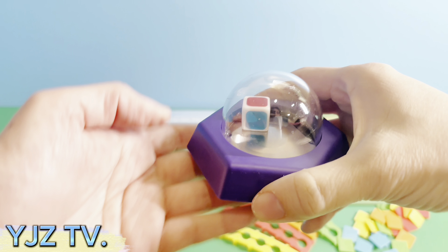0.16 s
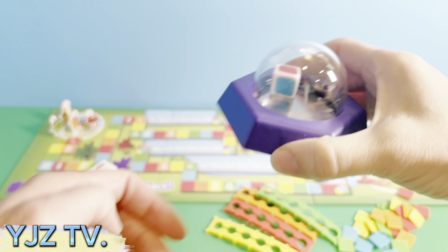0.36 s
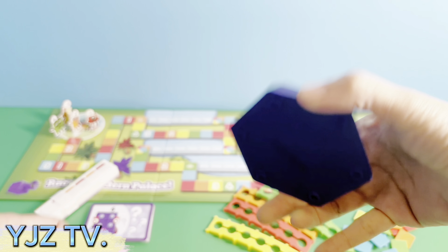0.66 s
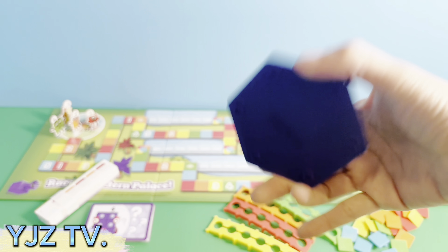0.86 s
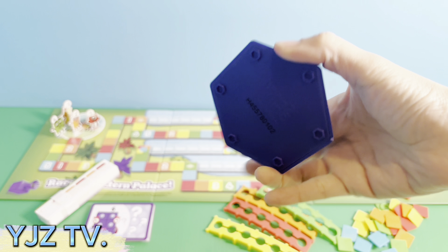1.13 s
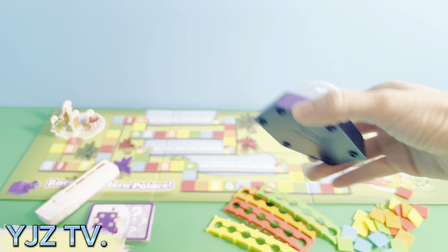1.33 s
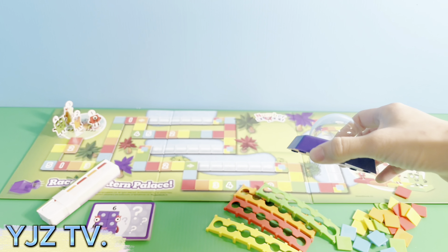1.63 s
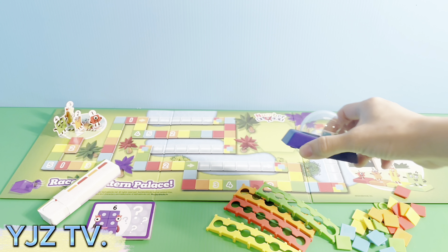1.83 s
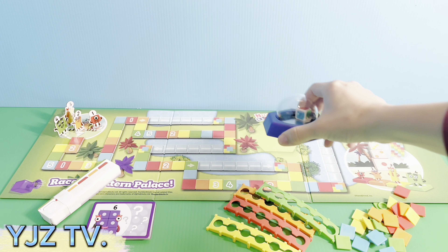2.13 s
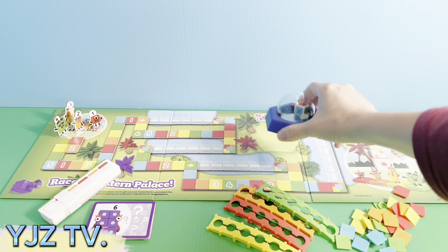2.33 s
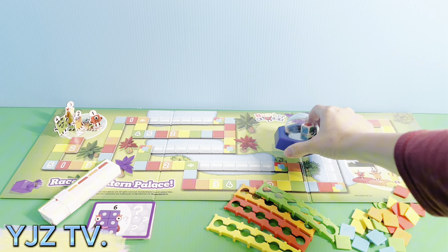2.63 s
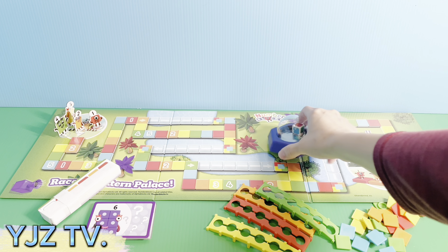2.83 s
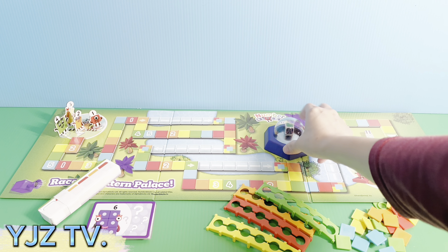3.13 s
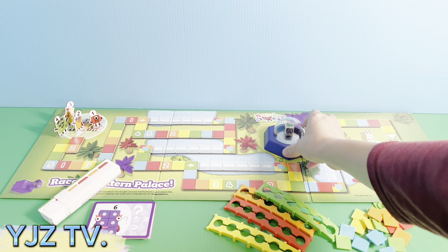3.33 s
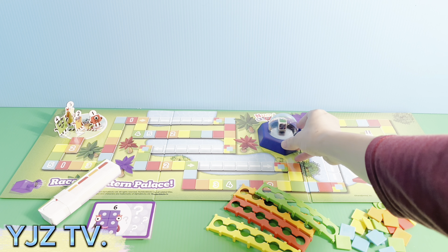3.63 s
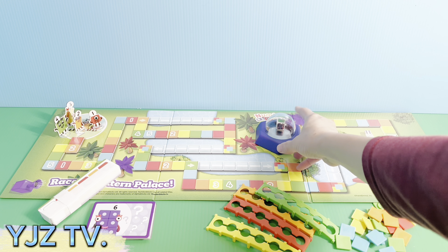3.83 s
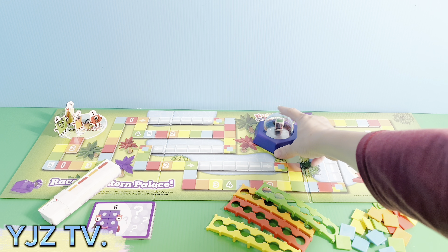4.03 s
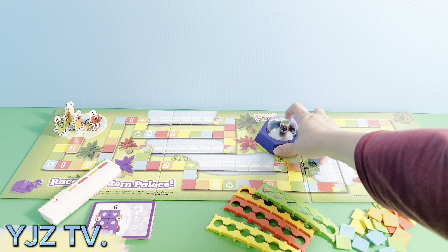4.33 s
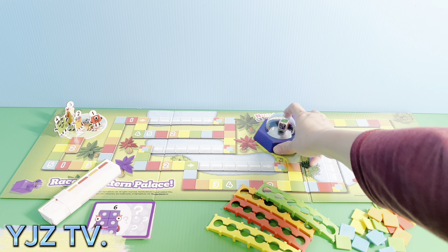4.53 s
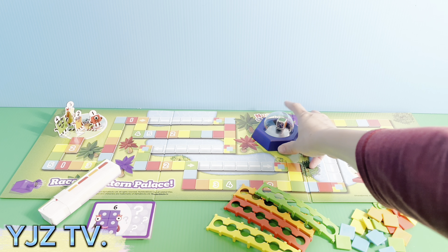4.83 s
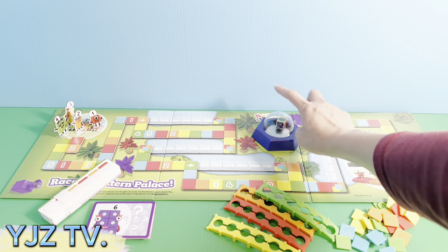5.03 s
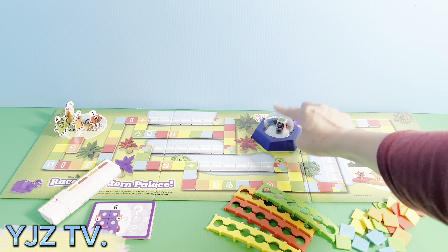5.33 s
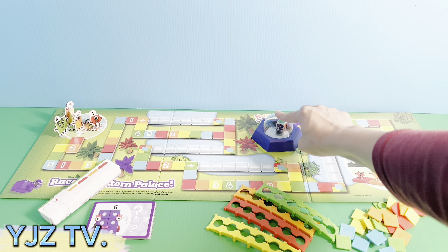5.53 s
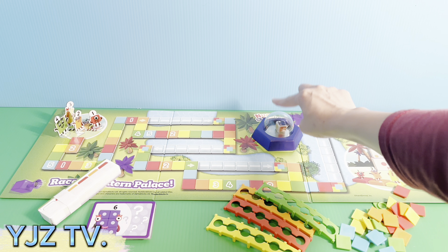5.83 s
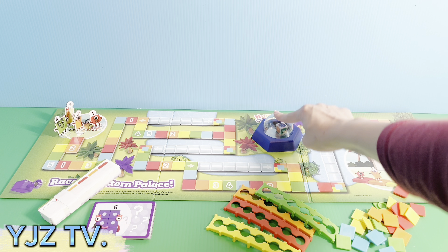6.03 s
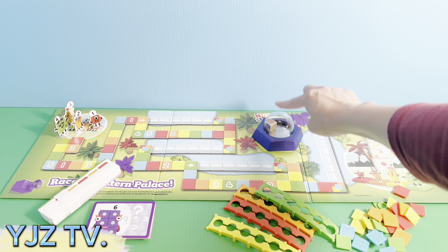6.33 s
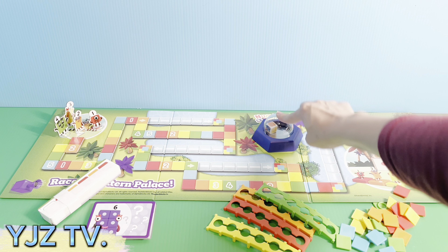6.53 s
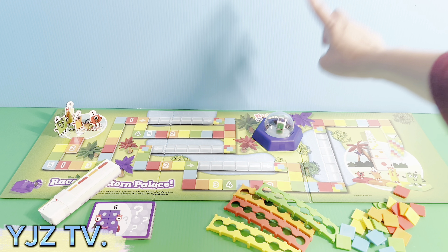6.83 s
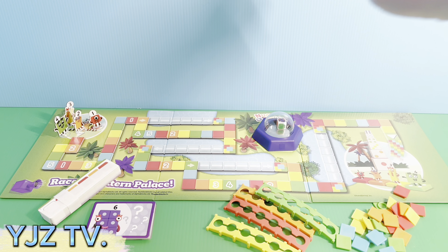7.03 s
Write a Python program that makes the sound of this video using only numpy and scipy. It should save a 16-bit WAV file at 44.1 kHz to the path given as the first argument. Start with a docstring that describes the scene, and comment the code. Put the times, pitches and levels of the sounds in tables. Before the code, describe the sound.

A die clatters brightly in a hollow plastic dome as the toy is tipped in the hand near a stereo microphone. It is carried away with faint skin and sleeve rustle and lands on a board with a woody clack. Light finger ticks and near silence follow, then three crisp two-part pops fling the die about, and a soft rustle ends it. Short room reflections, low background rumble.

```python
"""In a small, lively room with a low rumble, a plastic dice popper is heard from close by.
It is turned over in the hand, so that the die tumbles in its dome, and is set down on a game board.
A finger presses the dome three times: the spring plate creaks, snaps down, snaps back and throws the die about.
Contacts are short bursts of noisy force that ring resonant plastic or board; sliding and rumble are coloured
noise, and shifting reflections place the toy in its room."""
import sys
import numpy as np
from scipy import signal
from scipy.fft import rfft, irfft, next_fast_len
from scipy.io import wavfile

SR = 44100
rng = np.random.default_rng(int(sys.argv[2]) if len(sys.argv) > 2 else 0)


def generate_wav(sig):
    """Save sig (samples, or channels by samples) to the path in sys.argv[1] as 16-bit PCM at SR."""
    pcm = np.round(np.clip(np.atleast_2d(sig).T, -1, 1) * 32767).astype(np.int16)
    wavfile.write(sys.argv[1], SR, pcm)


N = 316197  # length [samples]
HIT_SIZE = 8192  # length of one contact with its ringing [samples]


def from_db(db):
    """Decibels to amplitude gain."""
    return 10 ** (np.asarray(db) / 20)


def rms_one(x):
    """Scale to unit rms."""
    return x / np.sqrt(np.mean(x ** 2) + 1e-20)


def at_hz(points, hz):
    """Read a table along a logarithmic frequency axis."""
    table_hz, value = np.transpose(points)
    return np.interp(np.log(np.maximum(hz, 1)), np.log(table_hz), value)


def bins(size):
    """Frequencies of a real transform [Hz]."""
    return np.arange(size // 2 + 1) * SR / size


def causal(gain):
    """The minimum-phase response with this magnitude: nothing sounds early."""
    cepstrum = irfft(np.log(gain + 1e-9))
    half = len(cepstrum) // 2
    cepstrum[1:half] *= 2
    cepstrum[half + 1:] = 0
    return np.exp(rfft(cepstrum))


def left_right(mid, side):
    """Two channels from mid and side."""
    return np.array([mid + side, mid - side])


def add(out, sound, s):
    """Mix a sound in at s seconds."""
    start = int(s * SR)
    out[:, start:start + sound.shape[1]] += sound[:, :N - start]


# broad crack of a contact: (frequency [Hz], level [dB])
CRACK_COLOUR = [(60, -27.5), (130, -11.5), (220, 0), (330, -2), (480, -4.5), (700, 6.5), (1500, -6.5),
                (2500, 1), (5000, 2), (8000, 3), (16000, -3)]


def body(modes, crack_db):
    """Responses of a struck part, one a row: the broad crack of the contact, then each two-pole resonance."""
    hz = bins(HIT_SIZE)
    z = np.exp(-2j * np.pi * hz / SR)  # delay of one sample
    rows = [causal(from_db(crack_db + at_hz(CRACK_COLOUR, hz)))]
    for mode_hz, width_hz, db in modes:
        radius = np.exp(-np.pi * width_hz / SR)
        poles = 1 - 2 * radius * np.cos(2 * np.pi * mode_hz / SR) * z + (radius * z) ** 2
        rows.append(from_db(db) * (1 - radius ** 2) / 2 * (1 - z * z) / poles)
    return np.array(rows)


# a favoured resonance is lifted over a half-width of ACCENT_HZ plus a share of its frequency
ACCENT_DB, ACCENT_HZ, ACCENT_SHARE = 6, 70, .035
MODE_SPREAD_DB = 3.5  # random spread of each resonance from contact to contact
# side of a contact relative to its mid: (frequency [Hz], level [dB])
CONTACT_SIDE = [(100, -17.5), (250, -12), (450, 3), (750, -1.5), (1300, -0.5), (2400, -8), (4400, -4.5),
                (8500, -13), (12000, -30.5), (15000, -18.5)]


def strike(contacts, modes, crack_db, side_db, pan_db, grain_db, swell):
    """Each contact is a short run of chatter that sets the part ringing; it swells for a share of its length.

    A level is the energy at 1.5-5 kHz, as dB over 10 ms; bass and treble are relative to that.
    """
    out = np.zeros((2, N))
    t, hz = np.arange(HIT_SIZE) / SR, bins(HIT_SIZE)
    responses = body(modes, crack_db)
    side_response = causal(from_db(side_db + at_hz(CONTACT_SIDE, hz)))
    bass = 1 / (1 + (hz / 1500) ** 8)
    treble = 1 - 1 / (1 + (hz / 5000) ** 8)
    ranges = np.array([bass, 1 - bass - treble, treble])
    for s, db, bass_db, treble_db, length_s, *favoured in contacts:
        mid, side, grain, strengths = rng.standard_normal((4, HIT_SIZE))
        progress = t / max(length_s, 5e-4)
        onset = 1 - np.exp(-(progress / swell) ** 2)
        force = onset * np.exp(-progress ** 2) * from_db(grain_db * np.tanh(grain))
        # every spot on the part drives the resonances differently
        mode_gains = from_db(MODE_SPREAD_DB * strengths[:len(modes), None])
        response = responses[0] + (mode_gains * responses[1:]).sum(axis=0)
        # the spot also favours two frequencies
        lift_db = sum(ACCENT_DB / (1 + ((hz - f) / (ACCENT_HZ + ACCENT_SHARE * f)) ** 2) for f in favoured)
        blow = left_right(rfft(mid * force), rfft(side * force) * side_response)
        sound = blow * response * causal(from_db(lift_db))
        # the hardness of the contact shares its energy between bass, middle and treble
        power = ranges @ np.mean(abs(sound) ** 2, axis=0) * 2 / HIT_SIZE / (.01 * SR)
        gains_db = db + np.array([bass_db, 0, treble_db]) - 10 * np.log10(power)
        add(out, irfft(sound * causal(from_db(gains_db @ ranges))), s)
    return out * from_db([[pan_db / 2], [-pan_db / 2]])


# side of rumble and sliding relative to their mid: (frequency [Hz], level [dB])
NOISE_SIDE = [(60, -14), (200, -13.5), (500, -2), (1500, 0), (4000, -2), (10000, -17)]


def coloured_noise(spectrum, resonances=()):
    """Stereo noise of rms 1, nearly alike in both ears in the bass, lifted at its resonances."""
    size = 2 * next_fast_len(N // 2 + 1)
    mid, side = rfft(rng.standard_normal((2, size)))
    hz = bins(size)
    lift_db = sum(db / (1 + (2 * (hz - f) / width) ** 2) for f, width, db in resonances)
    colour_db = at_hz(spectrum, hz) + lift_db
    stereo = left_right(mid, side * from_db(at_hz(NOISE_SIDE, hz)))
    return rms_one(irfft(stereo * from_db(colour_db))[:, :N])


# background rumble, shape only: (frequency [Hz], relative level [dB])
RUMBLE_COLOUR = [(20, -34), (30, -29), (42, -5.5), (55, -3), (70, 0.5), (100, -6), (190, -13), (330, -15.5),
                 (440, -11), (680, -23.5), (1200, -25), (2600, -48.5), (6000, -56.5), (16000, -55)]
RUMBLE_DB = -54.5  # rms level


def rumble():
    """Steady noise, strongest in the bass, lies under the whole scene."""
    return from_db(RUMBLE_DB) * coloured_noise(RUMBLE_COLOUR)


# sliding fingers and sleeve while the toy is held, carried, steadied and let go, before the trim RUB_DB:
# (time [s], level [dB])
RUB_LEVELS = [(0.0, -60.5), (0.29, -64), (1.38, -58), (1.644, -56), (1.792, -60.5), (2.14, -74.5),
              (2.78, -69.5), (3.2, -65), (3.502, -71), (3.692, -66), (3.866, -60.5), (3.962, -66),
              (4.106, -68), (4.808, -80), (5.04, -84.5), (6.9, -52), (7.044, -56), (7.17, -72)]
RUB_DB = 1.5
# colour of the sliding, shape only: (frequency [Hz], relative level [dB])
RUB_SPECTRUM = [(300, -9.5), (900, -1), (1900, -6), (3500, -7), (6000, -8), (10000, -14), (15000, -15)]
# the rubbed shell sings faintly: (frequency [Hz], width [Hz], lift [dB])
RUB_MODES = [(1830, 690, 9.5), (3143, 270, 6.5)]


def rubbing(slip_db, slips_per_s):
    """Skin and cloth slide unevenly, catching and slipping: noise whose level wavers at random."""
    t = np.arange(N) / SR
    slips = np.interp(t * slips_per_s, np.arange(N), rng.standard_normal(N))
    level_db = RUB_DB + np.interp(t, *np.transpose(RUB_LEVELS)) + slip_db * slips
    return coloured_noise(RUB_SPECTRUM, RUB_MODES) * from_db(level_db)


# the die slides and rolls over the floor of the dome:
# (time [s], level [dB], treble [dB], length [s])
DIE_SLIDES = [(0.313, -48.5, -2, .016), (0.423, -31.5, -8, 0.039), (0.592, -47, -7, 0.013),
              (1.077, -47, -8, 0.024), (1.205, -38, -3.5, 0.056), (1.722, -48, -0.5, 0.071),
              (1.963, -63, 3, 0.037), (2.322, -63.5, 2.5, 0.066), (2.492, -58.5, 5.5, 0.051),
              (2.528, -49.5, -3, 0.046), (2.874, -33, 1, 0.049), (2.935, -34.5, 4.5, 0.033),
              (5.687, -34.5, 6, 0.053), (6.171, -34.5, 3.5, .054), (6.741, -35.5, 5, 0.047)]
# resonances of the dome: (frequency [Hz], width [Hz], level [dB])
DOME_MODES = [(530, 28, -9), (900, 230, -25.5), (1179, 67, 0.5), (1251, 13, 5), (1730, 80, -6),
              (2040, 240, -1.5), (2206, 46, -1), (2700, 90, -4.5), (2853, 150, 1.5), (3270, 50, -1.5),
              (3420, 25, -8), (4130, 150, -1), (4770, 70, -4), (5040, 20, -3), (6430, 27, -18.5),
              (7020, 110, -10), (8350, 160, -9.5), (9100, 630, -21), (14700, 270, -8)]
DOME_NOTE_HZ = 1213  # main note, which hits and slides of the die bring out
# a firmer slide is thinner: bass at a middling level, that level, dB lost per dB
SLIDE_BASS_DB, SLIDE_MIDDLING_DB, SLIDE_THINNING = 1, -48.5, 0.16
SLIDE_HIGH_HZ = 2050  # favoured high resonance


def die_slides():
    """Long, grainy contacts of the die set the dome ringing between the hits."""
    slides = []
    for s, db, treble_db, length_s in DIE_SLIDES:
        bass_db = SLIDE_BASS_DB - SLIDE_THINNING * (db - SLIDE_MIDDLING_DB)
        slides.append((s, db, bass_db, treble_db, length_s, DOME_NOTE_HZ, SLIDE_HIGH_HZ))
    return strike(slides, DOME_MODES, crack_db=-6.5, side_db=-8.5, pan_db=0.3, grain_db=1.0, swell=0.39)


# the die hits dome and floor:
# (time [s], level [dB], treble [dB], length [s], favoured high resonance [Hz])
DIE_BLOWS = [(0.414, -36.5, -2.5, .006, 3500), (0.445, -39.5, 11.5, 0.0037, 2820),
             (0.47, -39, 7, 0.0027, 2030), (0.512, -31.5, -1.5, 0.0041, 2230),
             (0.636, -47, -0.5, 0.0075, 2040), (0.688, -44, -3.5, 0.011, 2200),
             (0.7575, -27.5, -2, 0.0058, 2740), (0.854, -28.5, -5, 0.0097, 2100),
             (0.903, -32, -7, 0.016, 4830), (0.9153, -27, 1, 0.0056, 4770), (0.965, -40, -8, 0.0071, 2800),
             (1.189, -45.5, 3.5, 0.014, 2800), (1.216, -43, 6, 0.0074, 2200),
             (2.891, -37, 2.5, 0.0069, 2030), (2.92, -41.5, 3.5, 0.013, 2200),
             (2.953, -40.5, 1, 0.0086, 5130), (5.625, -34, -15, 0.003, 4200),
             (5.679, -39, 10.5, .013, 2100), (5.71, -35, 6.5, 0.017, 3280),
             (6.0705, -32.5, 6.5, 0.012, 2060), (6.1228, -27.5, 5, 0.012, 3240),
             (6.174, -33, 1.5, 0.0094, 3250), (6.593, -35.5, 3, 0.0074, 3200), (6.673, -32, 8, 0.012, 5740),
             (6.732, -30, 1.5, 0.008, 3960), (6.779, -49, -3, 0.0074, 2030)]
# the harder the die hits, the thinner its bass: bass of a light hit, level where thinning starts, dB lost per dB
DIE_BASS_DB, DIE_FIRM_DB, DIE_THINNING = 4, -32, 2.04


def die_hits():
    """Each hit brings out the dome's note and one higher resonance, depending on where the die lands."""
    hits = []
    for s, db, treble_db, length_s, high_hz in DIE_BLOWS:
        bass_db = DIE_BASS_DB - DIE_THINNING * max(db - DIE_FIRM_DB, 0)
        hits.append((s, db, bass_db, treble_db, length_s, DOME_NOTE_HZ, high_hz))
    return strike(hits, DOME_MODES, crack_db=-11.0, side_db=0.5, pan_db=0.5, grain_db=6.0, swell=0.39)


# dull knocks of die and fingers on the housing: (time [s], level [dB], bass [dB])
HOUSING_KNOCKS = [(0.4251, -38.5, 18.5), (0.629, -45.5, 7.5), (0.666, -47, 18.5), (.769, -39.5, 7.5),
                  (0.809, -58, 25.5), (0.826, -52, 12.5), (.884, -49.5, 5.5), (.912, -52.5, 20.5),
                  (1.131, -45.5, 15), (1.298, -50, 14), (2.963, -48, 13.5)]
# resonances of the housing: (frequency [Hz], width [Hz], level [dB])
HOUSING_MODES = [(472, 45, 1.5), (599, 73, 4.5), (758, 210, -4), (1030, 63, -3.5), (1140, 29, 6.5),
                 (1250, 27, 5), (1740, 140, 0), (2120, 120, 7), (2770, 130, 3.5)]
KNOCK_S, KNOCK_TREBLE_DB, KNOCK_HIGH_HZ = 0.0063, -5.5, 1850
# while the toy is turned over, the die also patters lightly at random moments
TUMBLE_START_S, TUMBLE_END_S = 0.63, 0.99
PATTER_DB, PATTER_SPREAD_DB, PATTER_BASS_DB = -54, 2.5, 12


def housing(count):
    """Dull knocks and light random patter ring the plastic housing."""
    patter = []
    for when, size in rng.random((count, 2)):
        s = TUMBLE_START_S + when * (TUMBLE_END_S - TUMBLE_START_S)
        db = PATTER_DB + PATTER_SPREAD_DB * (2 * size - 1)
        patter.append((s, db, PATTER_BASS_DB))
    knocks = [(s, db, bass_db, KNOCK_TREBLE_DB, KNOCK_S, DOME_NOTE_HZ, KNOCK_HIGH_HZ)
              for s, db, bass_db in HOUSING_KNOCKS + patter]
    return strike(knocks, HOUSING_MODES, crack_db=-36.5, side_db=-1, pan_db=-1.0, grain_db=0.5, swell=0.11)


# dry ticks as the fingers shift their grip: (time [s], level [dB])
TICKS = [(2.015, -72), (2.125, -62), (3.372, -55.5), (3.846, -52), (3.969, -58.5), (4.129, -70.5),
         (4.329, -69), (4.596, -67.5)]
# resonances of the shell under the fingers: (frequency [Hz], width [Hz], level [dB])
SHELL_MODES = [(457, 48, 3), (1280, 81, -10.5), (1690, 49, 5), (2110, 140, 5), (2856, 90, 10)]
TICK_S, TICK_THUD_DB, TICK_TREBLE_DB, TICK_LOW_HZ, TICK_HIGH_HZ = 0.0052, -51.5, -5, 435, 1770


def grip_ticks():
    """Fingers tick on the shell; the thud keeps one level, so the lightest ticks are the dullest."""
    ticks = [(s, db, TICK_THUD_DB - db, TICK_TREBLE_DB, TICK_S, TICK_LOW_HZ, TICK_HIGH_HZ) for s, db in TICKS]
    return strike(ticks, SHELL_MODES, crack_db=-3, side_db=-4, pan_db=4, grain_db=5.5, swell=.35)


# the feet land on the board one after another:
# (time [s], level [dB], bass [dB], treble [dB], favoured low resonance [Hz])
FOOT_BLOWS = [(2.8216, -33, -5, -7, 227), (2.8266, -29, 3.5, 6.5, 217.5), (2.8384, -18.5, -1.5, -10.5, 709),
              (2.848, -27.5, -5, 1, 230), (2.871, -30, -2.5, -4.5, 231)]
# resonances of the game board: (frequency [Hz], width [Hz], level [dB])
BOARD_MODES = [(160, 36, -13), (230, 81, 1), (382, 90, -5), (450, 70, 9.5), (750, 58, 14), (966, 150, 5),
               (1150, 52, 4), (1650, 120, 2.5), (2025, 150, -11.5), (2943, 250, -3), (4900, 680, -8)]
FOOT_S, FOOT_HIGH_HZ = 0.0047, 1940


def feet():
    """The toy is set down: each foot strikes the board, which resounds."""
    blows = [(s, db, bass_db, treble_db, FOOT_S, low_hz, FOOT_HIGH_HZ)
             for s, db, bass_db, treble_db, low_hz in FOOT_BLOWS]
    return strike(blows, BOARD_MODES, crack_db=-7.5, side_db=-1.0, pan_db=0.4, grain_db=-11, swell=0.34)


# the fingertip lands on the dome: (time [s], level [dB])
FINGER_TAPS = [(5.0734, -35), (5.267, -53), (5.381, -48)]
# resonances shared by taps and the plate under the finger: (frequency [Hz], width [Hz], level [dB])
PRESSED_MODES = [(755, 130, 7.5), (800, 190, 12), (1120, 450, -6), (1677, 224, -4.5), (2110, 410, 2.5),
                 (2510, 180, -16), (2870, 56, -4.5), (4460, 137, 5.5), (5750, 44, 7), (7620, 1600, -10.5),
                 (10000, 1600, -19)]
TAP_S, TAP_BASS_DB, TAP_TREBLE_DB, TAP_LOW_HZ, TAP_HIGH_HZ = 0.011, 2.5, 0.5, 847, 4630


def finger_taps():
    """The fingertip lightly sounds the dome, with the resonances of the pressed plate."""
    taps = [(s, db, TAP_BASS_DB, TAP_TREBLE_DB, TAP_S, TAP_LOW_HZ, TAP_HIGH_HZ) for s, db in FINGER_TAPS]
    return strike(taps, PRESSED_MODES, crack_db=-2, side_db=-3.5, pan_db=4.0, grain_db=2.5, swell=0.32)


# the loaded plate creaks, each time with the same low hum: (time [s], level [dB], bass [dB])
CREAK_SLIPS = [(5.366, -48, 15.5), (5.823, -47, 11), (5.833, -41, 16.5), (5.866, -47, 20), (6.322, -46, 15),
               (6.328, -44.5, 12.5), (6.369, -53.5, 17.5)]
# resonances of the loaded plate: (frequency [Hz], width [Hz], level [dB])
CREAK_MODES = [(242, 34, -38), (767, 27, -16.5), (798, 26, -8.5), (2080, 180, -14), (2762, 88, -29),
               (3250, 69, -11.5), (5780, 310, -6), (8430, 400, -18)]
CREAK_S, CREAK_TREBLE_DB, CREAK_LOW_HZ, CREAK_HIGH_HZ = 0.0071, 2, 825, 2100


def creaking():
    """The plate gives in small slips before it snaps, and each slip sets it humming."""
    slips = [(s, db, bass_db, CREAK_TREBLE_DB, CREAK_S, CREAK_LOW_HZ, CREAK_HIGH_HZ)
             for s, db, bass_db in CREAK_SLIPS]
    return strike(slips, CREAK_MODES, crack_db=-24.0, side_db=-10.0, pan_db=3.0, grain_db=1.5, swell=0.51)


# the plate snaps down under the finger:
# (time [s], level [dB], treble [dB], favoured high resonance [Hz])
SNAPS_DOWN = [(5.4861, -19, -3.5, 2570), (5.8758, -20, .5, 2220), (6.3915, -20.5, 2.5, 1640)]
PRESS_S, PRESS_BASS_DB, PRESS_LOW_HZ = 0.0033, 1.5, 728


def plate_down():
    """The finger damps the snapping plate, so a broad crack stands beside its resonances."""
    snaps = [(s, db, PRESS_BASS_DB, treble_db, PRESS_S, PRESS_LOW_HZ, high_hz)
             for s, db, treble_db, high_hz in SNAPS_DOWN]
    return strike(snaps, PRESSED_MODES, crack_db=-11, side_db=0.5, pan_db=3.0, grain_db=-4.0, swell=0.23)


# the plate snaps back and flings the die:
# (time [s], level [dB], bass [dB], treble [dB], favoured high resonance [Hz])
SNAPS_BACK = [(5.6075, -21.5, -1, 5, 2190), (6.0488, -25.5, 7, 5.5, 2100), (6.563, -20.5, 3, 1.5, 4300)]
# resonances of the freed plate: (frequency [Hz], width [Hz], level [dB])
FREE_MODES = [(466.5, 65, 7.5), (751, 18, 18), (819, 120, 5), (1240, 300, -3), (1980, 93, -1.5),
              (2740, 27, -18.5), (3180, 100, -4.5), (4330, 130, -4.5), (5270, 100, -33), (5850, 92, -2),
              (6900, 120, -2.5), (8200, 110, -1.5), (9650, 270, -19.5), (13200, 2100, -18)]
RELEASE_S, RELEASE_LOW_HZ = .0057, 716


def plate_back():
    """The plate springs back and rings freely."""
    snaps = [(s, db, bass_db, treble_db, RELEASE_S, RELEASE_LOW_HZ, high_hz)
             for s, db, bass_db, treble_db, high_hz in SNAPS_BACK]
    return strike(snaps, FREE_MODES, crack_db=-12.5, side_db=-1.0, pan_db=1.7, grain_db=0.5, swell=0.27)


# decay of the room's tail: (frequency [Hz], time to fall 60 dB [s])
TAIL_T60 = [(150, 0.4), (700, 0.58), (1400, 0.48), (3700, 0.42), (9000, 0.41), (15000, 0.28)]
# likeness of left and right in the reflections: (frequency [Hz], correlation [-1 to 1])
TAIL_LIKENESS = [(100, 0.93), (290, 1), (650, -0.1), (1400, 0.022), (3100, 0.7), (5500, 0.059), (8500, 1),
                 (15000, 1)]
# colour of the reflections, shape only: (frequency [Hz], relative level [dB])
TAIL_COLOUR = [(100, -1.5), (300, 2.5), (700, -5), (1300, 3.5), (2500, -0.5), (5000, 1), (9000, -4.5),
               (15000, -1)]


def room_response(wet_db, first_wall_s, early_db, early_s):
    """Dense early reflections from table and walls, then a tail that dies band by band."""
    t = np.arange(SR // 2) / SR
    edges = np.geomspace(70, 18000, 13)
    white, tail = rng.standard_normal((2, 2, len(t))), 0
    for k, (low, high) in enumerate(zip(edges, edges[1:])):
        band = signal.butter(2, [low, high], "band", fs=SR, output="sos")
        mid, side = signal.sosfilt(band, white[k % 2])
        hz = np.sqrt(low * high)
        alike = np.clip(at_hz(TAIL_LIKENESS, hz), -.99, .99)
        fade = from_db(at_hz(TAIL_COLOUR, hz) - 60 * t / at_hz(TAIL_T60, hz))
        tail = tail + fade * left_right(np.sqrt(1 + alike) * mid, np.sqrt(1 - alike) * side)
    early = 1 + from_db(early_db) * np.exp(-t / early_s)
    onset = 1 - np.exp(-(t / first_wall_s) ** 2)
    return from_db(wet_db) * rms_one(tail * early * onset) / np.sqrt(len(t))


def room(x, count):
    """Toy, hand and arm keep moving, so crossfaded pieces cycle through different patterns of reflections."""
    patterns = [room_response(wet_db=-4, first_wall_s=0.0026, early_db=5.0, early_s=0.017) for _ in range(count)]
    out, hop = np.zeros((2, N)), SR // 8
    fade = signal.windows.cosine(2 * hop)
    for k, start in enumerate(range(0, N - 2 * hop, hop)):
        piece = x[:1, start:start + 2 * hop] * fade  # the left channel feeds both sides of the room
        add(out, signal.fftconvolve(piece, patterns[k % count], axes=1), start / SR)
    return out


def scene():
    """The toy in its room, with sliding fingers and a low rumble."""
    die = die_slides() + die_hits()
    handling = housing(count=8) + grip_ticks() + feet() + finger_taps()
    toy = die + handling + plate_down() + plate_back()
    creak = creaking()
    # the toy starts close to the microphone and is carried back to the board, where the room is stronger
    near_db = np.interp(np.arange(N) / SR, [1.3, 2.6], [-2.5, 0])
    # the hand covers the creaking plate, so 7 dB less of it reaches the walls
    echo = room((toy + from_db(-7) * creak) * from_db(near_db), count=7)
    return toy + creak + echo + rubbing(slip_db=2.0, slips_per_s=78) + rumble()


# colour of the microphone: (frequency [Hz], level [dB])
MICROPHONE_COLOUR = [(100, -0.5), (7000, 1), (10300, 3.5), (11400, 3), (12200, -1), (13300, 1),
                     (14500, 2.5), (16000, -14.5)]
# the two microphone ports hear the treble out of step: (frequency [Hz], phase by which left leads [rad])
PORT_LEAD = [(300, 0), (2000, -.3), (2600, .8), (4400, .6), (5200, -1.3), (6500, -1.9), (7100, -4.7),
             (9000, -6.28), (12100, -9.42), (15300, -12.57)]
CUTOFF_HZ = 16200


def record(dry):
    """The microphone colours the sound and turns the phase between its ports; peaks are rounded, the top is cut."""
    size = 2 * next_fast_len(N // 2 + HIT_SIZE)
    hz = bins(size)
    ports = np.exp(.5j * np.outer([1, -1], at_hz(PORT_LEAD, hz)))
    colour = causal(from_db(at_hz(MICROPHONE_COLOUR, hz)))
    heard = irfft(rfft(dry, size) * ports * colour)[:, :N]
    rounded = 1.2 * np.tanh(heard / 1.2)
    top_cut = signal.ellip(12, .2, 100, CUTOFF_HZ, fs=SR, output="sos")
    return signal.sosfilt(top_cut, rounded)


dry = scene()
out = record(dry)
generate_wav(out)
```